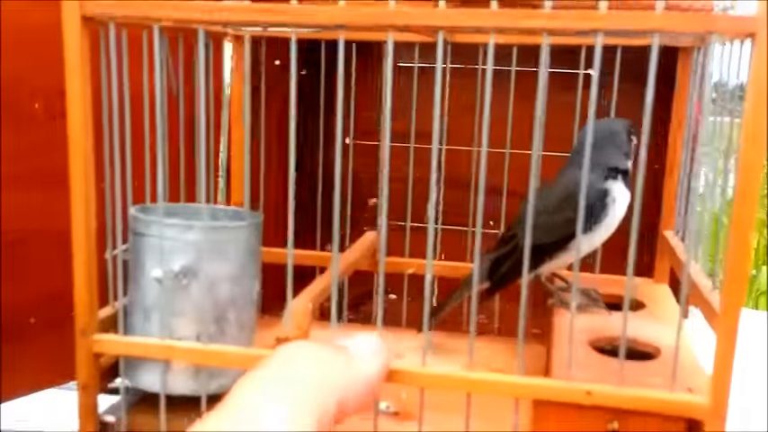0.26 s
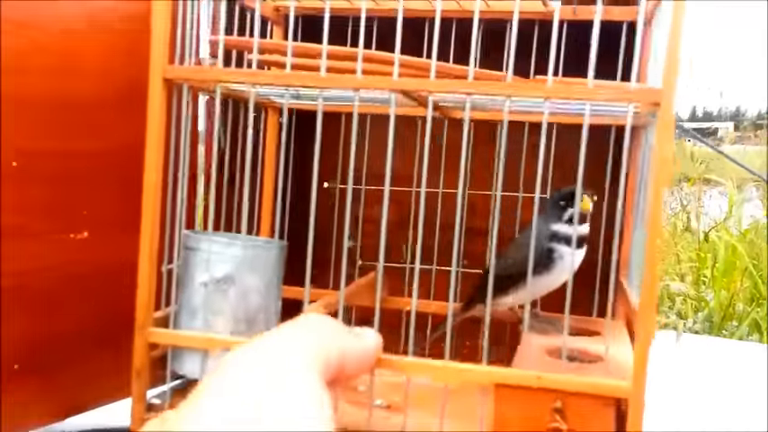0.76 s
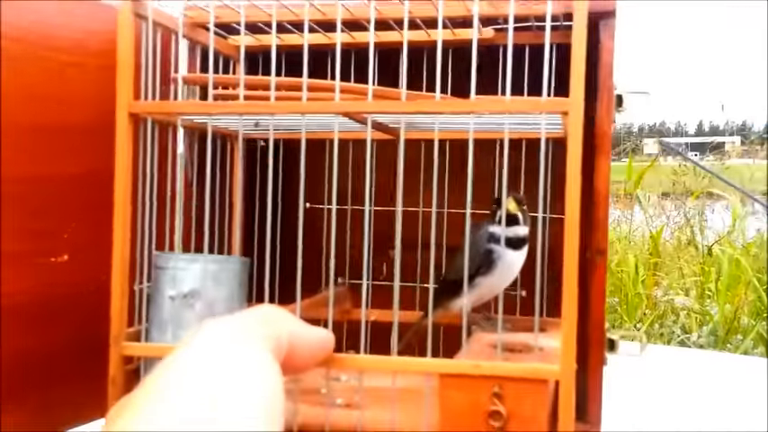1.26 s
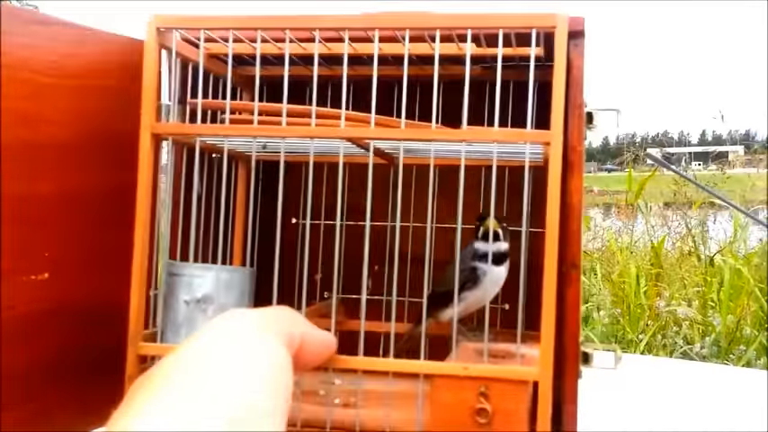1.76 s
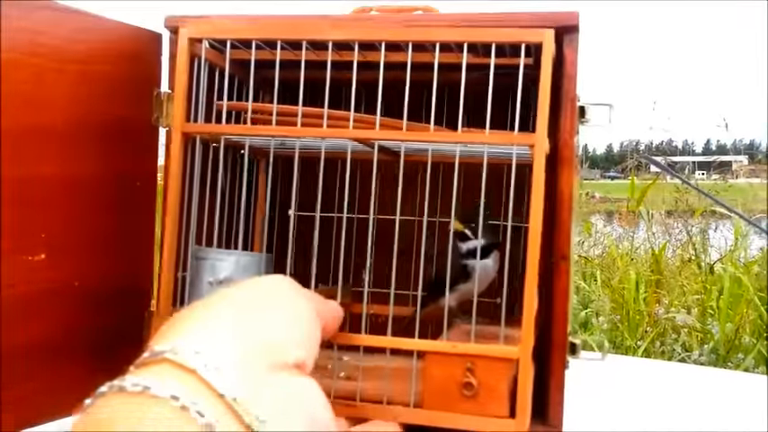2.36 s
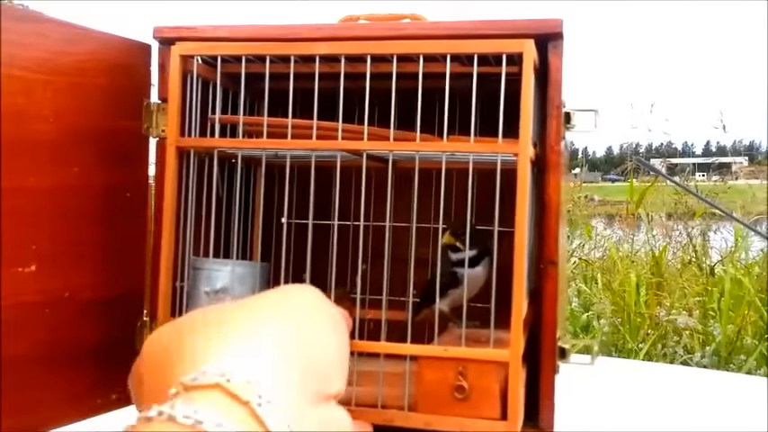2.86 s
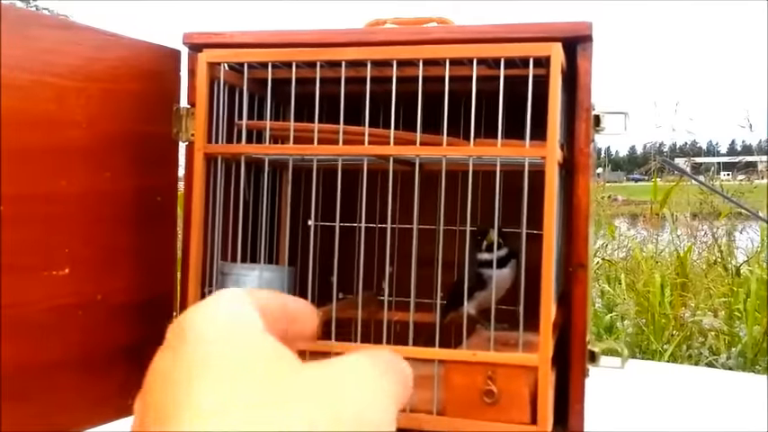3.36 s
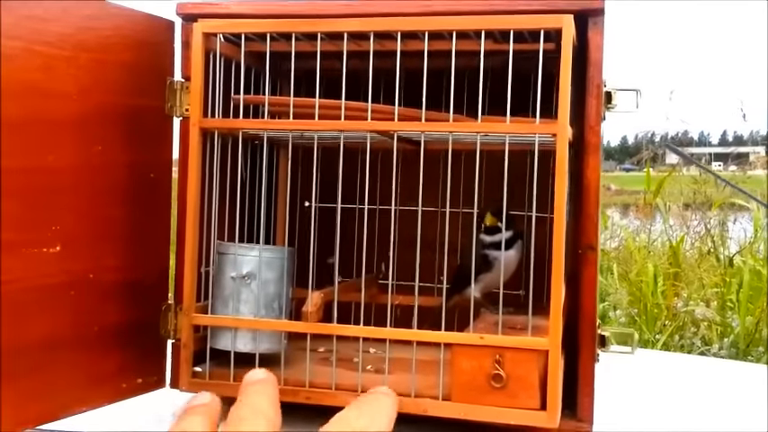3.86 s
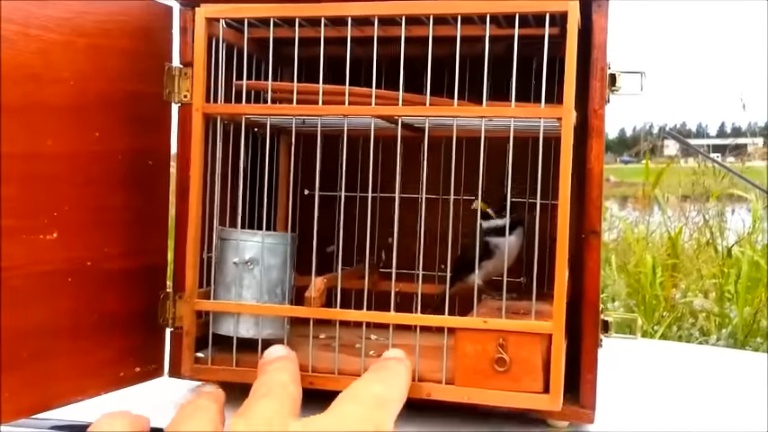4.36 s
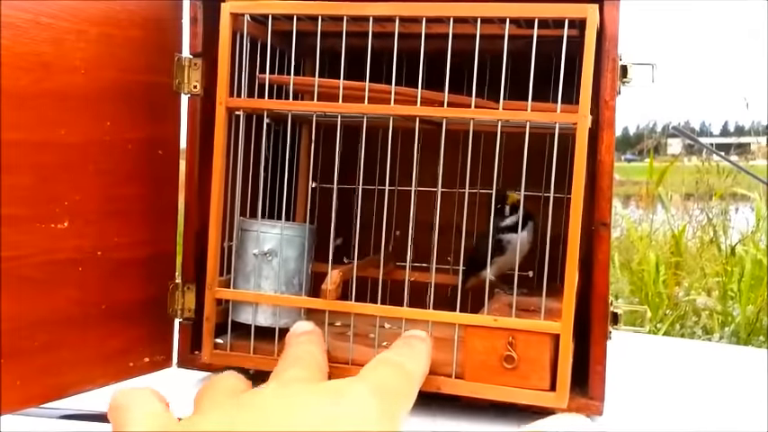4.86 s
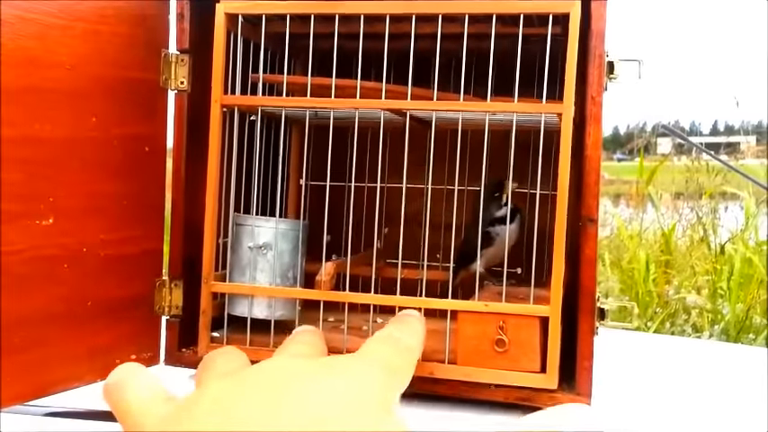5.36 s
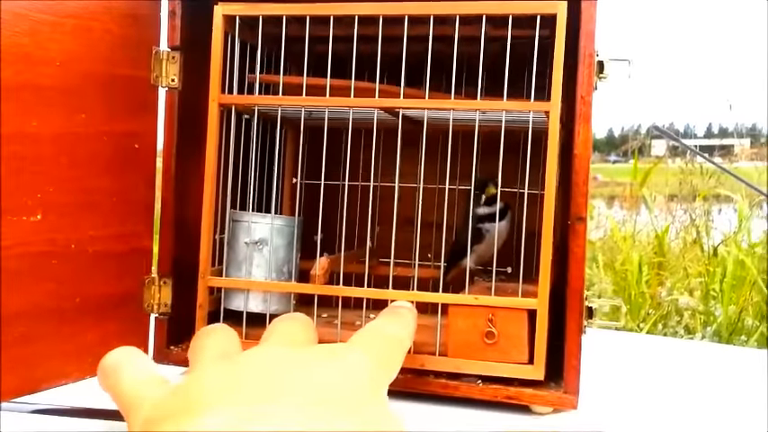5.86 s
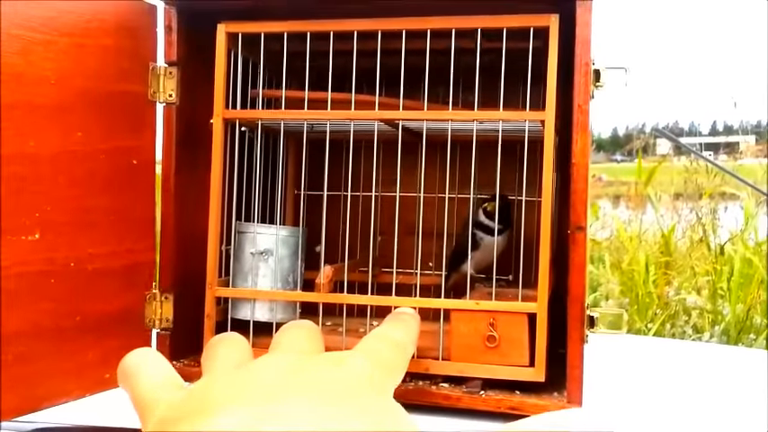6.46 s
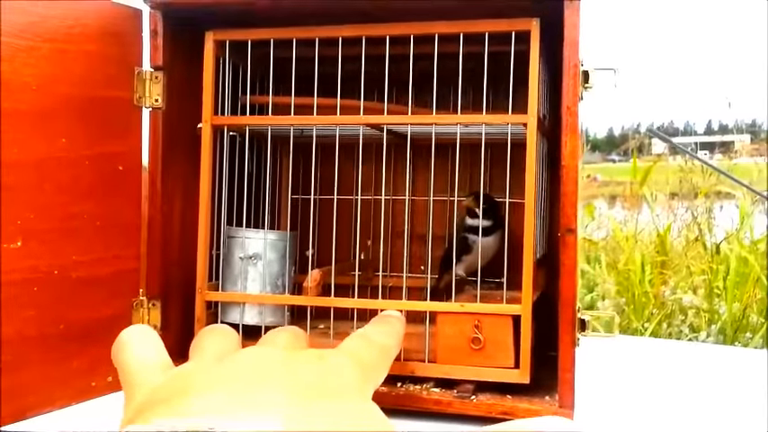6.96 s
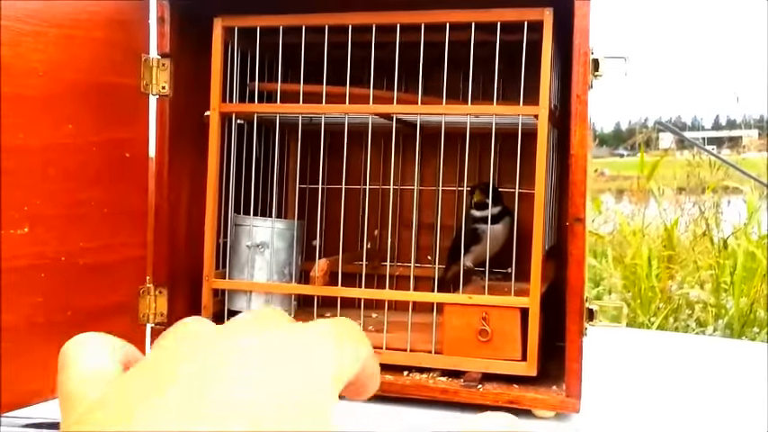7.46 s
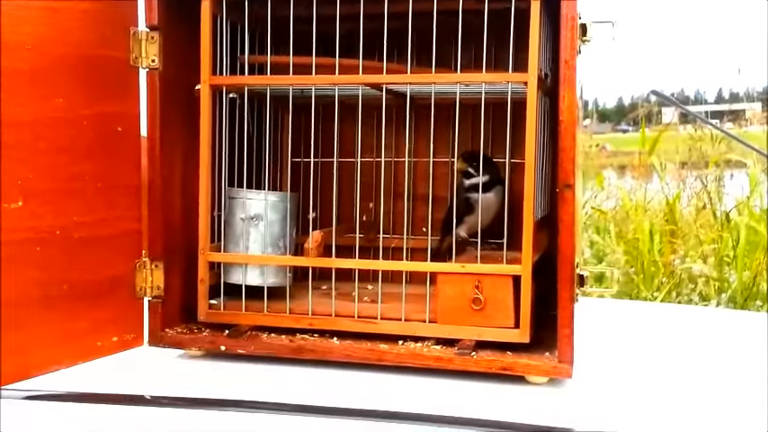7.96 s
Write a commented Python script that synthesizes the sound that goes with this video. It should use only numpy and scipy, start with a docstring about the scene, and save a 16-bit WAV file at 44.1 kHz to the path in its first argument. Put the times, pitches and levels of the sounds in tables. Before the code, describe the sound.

A handheld microphone close to a wooden bird cage outdoors picks up low handling rumble, continuous high crickets and thin far whistles. An early tick and sharp tap lead to about one second of bright, breathy, swooping finch song. A cluster of wooden knocks comes midway, then soft bumps, a feathery swish and rough doubled scolds to the end. The right side carries the scene, the left only hiss; noise suppression makes the background pump.

```python
"""Far traffic and air, handling rumble and crickets come first, soon joined by thin far bird whistles.
A beak ticks on a wire and fingers tap a wooden cage and the recorder; a small finch sings gliding notes
and later, after a soft rustle, scolds. Tones glide in pitch; noise is coloured; struck wood and wire ring.
Only the right input has a microphone; the left carries hiss alone.
A noise suppressor lowers both inputs whenever little stands out of the background."""
import sys
import numpy as np
from scipy import signal
from scipy.fft import rfft, irfft, next_fast_len
from scipy.io import wavfile
from scipy.ndimage import uniform_filter1d, minimum_filter1d, map_coordinates

SR = 44100
rng = np.random.default_rng(int(sys.argv[2]) if len(sys.argv) > 2 else 0)


def inscribe(sig):
    """Save sig as 16-bit PCM at rate SR to the path in sys.argv[1].

    A 1-D sig is mono; a 2-D sig holds one channel per row.
    Samples are clipped to [-1, 1] before scaling.
    """
    pcm = np.round(np.clip(np.atleast_2d(sig).T, -1, 1) * 32767)
    wavfile.write(sys.argv[1], SR, pcm.astype(np.int16))


def volts_from_db(level):
    """Convert decibel levels to linear amplitude ratios."""
    exponent = np.asarray(level, float) / 20
    return 10 ** exponent


N = 362502
T = np.arange(N) / SR  # seconds


def unit(x):
    """Scaled to rms 1."""
    return x / np.sqrt(np.mean(x ** 2))


def wobble(rate, size=N):
    """A smooth random curve through `rate` random points a second."""
    points = rng.standard_normal(int(size * rate / SR) + 4)
    return map_coordinates(points, [np.arange(size) * rate / SR])


def colour(spectrum, m):
    """Gains on an FFT grid, drawn through (Hz, dB) points; silent outside them."""
    hz, db = np.transpose(spectrum)
    grid_hz = np.fft.rfftfreq(m, 1 / SR)
    return volts_from_db(np.interp(np.log(grid_hz + 1), np.log(hz), db, left=-120, right=-120))


def shape(x, spectrum):
    """Filters a full-length sound by (Hz, dB) points."""
    m = next_fast_len(N)
    return irfft(rfft(x, m) * colour(spectrum, m), m)[:N]


def noise(spectrum):
    """Noise of rms 1 coloured by (Hz, dB) points."""
    return unit(shape(rng.standard_normal(next_fast_len(N)), spectrum))


def add(track, s, sound):
    """Mixes a sound into the track at s seconds."""
    part = track[round(s * SR):][:len(sound)]
    part += sound[:len(part)]


def whistle(hz, gain, tones, flutter_db, jitter_hz):
    """A gliding tone with harmonics; level and pitch flutter fast."""
    moving_hz = hz + jitter_hz * wobble(490, size=len(hz))
    phase = 2 * np.pi * np.cumsum(moving_hz) / SR + 2 * np.pi * rng.random()
    stack = sum(volts_from_db(db) * np.sin((k + 1) * phase) for k, db in enumerate(tones))
    return stack * gain * volts_from_db(flutter_db * wobble(252, size=len(hz)))


def calls(rows, tones, flutter_db, jitter_hz, edge):
    """Short notes whose pitch bends through three points under a swell."""
    track = np.zeros(N)
    for s, length, hz0, hz1, hz2, db in rows:
        u = np.linspace(0, 1, round(length * SR))
        hz = hz0 * (1 - u) * (1 - 2 * u) + 4 * hz1 * u * (1 - u) + hz2 * u * (2 * u - 1)  # parabola
        swell = np.sin(np.pi * u) ** edge
        add(track, s, whistle(hz, volts_from_db(db) * swell, tones, flutter_db, jitter_hz))
    return track


def glides(rows, tones, settle, attack, release, flutter_db, jitter_hz):
    """Notes gliding early (settle > 0) or late (< 0); attack and release are shares of the note."""
    track = np.zeros(N)
    for s, length, start_hz, end_hz, db in rows:
        u = np.linspace(0, 1, round(length * SR))
        hz = start_hz + (end_hz - start_hz) * np.expm1(-settle * u) / np.expm1(-settle)
        swell = np.clip(np.minimum(u / attack, (1 - u) / release), 0, 1)
        add(track, s, whistle(hz, volts_from_db(db) * swell, tones, flutter_db, jitter_hz))
    return track


def bursts(rows, spectrum, edge):
    """Noise of one colour under short swells."""
    swells = np.zeros(N)
    for s, length, db in rows:
        u = np.clip((T - s) / length, 0, 1)
        swells += volts_from_db(db) * np.abs(np.sin(np.pi * u)) ** edge * (T < s + length)
    return noise(spectrum) * swells


def echoes(x, t60, delay):
    """A diffuse answer of energy 1 that dies by 60 dB in t60 seconds."""
    t = np.arange(SR // 4) / SR
    tail = rng.standard_normal(len(t)) * volts_from_db(-60 * t / t60)
    answer = np.pad(tail / np.linalg.norm(tail), (round(delay * SR), 0))
    return signal.fftconvolve(x, answer)[:N]


# The colour of far traffic and air. Each row: pitch in Hz, relative level in dB per Hz.
AIR_COLOUR = [(25, -22), (100, -7.5), (165, 0), (250, -14.5), (340, -12), (500, -19.5), (1000, -18.5),
              (2000, -23), (3000, -25), (4600, -20.5), (7000, -26.5), (10000, -28.5), (14700, -29.5)]


def field():
    """Far traffic and air: a nearly even coloured noise."""
    return volts_from_db(-56 + 0.48 * wobble(2.925)) * noise(AIR_COLOUR)


# How strongly hands rumble on the recorder, around which the lumps vary. Each row: time in seconds, level in dB.
HANDLING_LEVEL = [(0, -64.5), (2, -65), (4.6, -56.5), (5.6, -63.5), (7.1, -63.5), (8.22, -71.5)]


def handling():
    """Hands on the recorder: low noise whose level wanders in slow and quick lumps."""
    level_db = np.interp(T, *np.transpose(HANDLING_LEVEL)) + 3.9 * wobble(5.4) + 3.7 * wobble(25)
    return volts_from_db(level_db) * noise([(30, -19), (60, 4), (170, -1), (350, -11)])


# The colour of the empty input. Each row: pitch in Hz, relative level in dB per Hz.
HISS_COLOUR = [(20, -7), (60, -7), (250, -7), (500, -5), (5000, -6.5), (14700, -6.5)]


def hiss():
    """The empty left input: steady faint noise."""
    return volts_from_db(-70.0) * noise(HISS_COLOUR)


# The three nearer crickets. Each row: middle of the first chirp in seconds, chirps per second,
# chirp length in seconds, pitch in Hz at start, middle and end, basic level in dB.
CRICKET_SINGERS = [(.056, 10.292, .05, 5720, 5990, 5780, -45.5),
                   (.050, 10.08, 0.05, 5750, 5600, 5400, -50.5), (0.047, 7.2, .03, 5950, 6100, 6200, -57)]
# How the first cricket swells and fades. Each row: time in seconds, change of level in dB.
FIRST_CRICKET_SWELL = [(0, 2), (1, 5), (1.7, 2), (3.3, -4), (4, -1.5), (5.8, -1.5), (6.2, -1), (7.2, 0),
                       (8.22, 2.5)]
# The blur of far crickets. Each row: pitch in Hz, relative level in dB.
CHORUS_COLOUR = [(4300, -37), (4650, -17), (5100, -17), (5400, -2), (5700, -4.5), (6150, -7), (6300, -44)]


def crickets():
    """Three steady singers drift in and out of step, over a blur of far ones."""
    track = volts_from_db(-61 + 2.6 * wobble(20)) * noise(CHORUS_COLOUR)
    for k, (first, rate, length, *pitch, db) in enumerate(CRICKET_SINGERS):
        starts = np.arange(first - length / 2, N / SR, 1 / rate)
        if k == 0:
            swell = np.interp(starts, *np.transpose(FIRST_CRICKET_SWELL))
        else:
            swell = 2 * wobble(0.49)[(starts * SR).astype(int)]
        levels = db + swell + rng.normal(0, 1.5, len(starts))
        rows = [(s, length, *pitch, level) for s, level in zip(starts, levels)]
        track += calls(rows, [0], flutter_db=2.8, jitter_hz=42, edge=0.97)
    return track + volts_from_db(-8.5) * echoes(track, 0.24, 0.0049)


# A far bird's quickening series. Each row: start of the held tone in seconds, its level in dB.
TRILL_NOTES = [(.09, -56), (.245, -52.5), (.395, -53.5), (.532, -52), (0.656, -55), (.77, -55),
               (.875, -51.5), (.98, -53.5), (1.097, -53.5), (1.2, -52), (1.905, -56), (1.985, -56),
               (2.06, -55.5), (2.205, -55), (2.287, -51.5), (2.375, -53), (2.445, -55), (2.51, -51.5)]


def trill():
    """Rows for up stroke, held tone and down stroke; the held tone shrinks through the series."""
    first_held_s, shrink_per_s = .043, 1.1
    stroke_s, stroke_db = .011, -0.5  # level relative to the held tone
    held_hz, low_hz, high_hz = 3120, 2850, 3600
    rows = []
    for s, db in TRILL_NOTES:
        held_s = first_held_s * np.exp(-shrink_per_s * s)
        rows += [(s - stroke_s - .3 * held_s, stroke_s, low_hz, high_hz, db + stroke_db),
                 (s, held_s, held_hz, held_hz, db),
                 (s + held_s, stroke_s, high_hz, low_hz, db + stroke_db)]
    return rows


# A far up-and-down call. Each row: start in seconds, level of the up half in dB.
SEESAW_CALLS = [(4.69, -65), (4.83, -59.5), (4.985, -57), (5.14, -57.5), (5.305, -57)]


def seesaw():
    """Rows for a rising half, then a louder falling half."""
    rows = []
    for s, db in SEESAW_CALLS:
        rows += [(s, .021, 6200, 7000, db), (s + .033, .022, 5300, 4500, db + 8)]
    return rows


# Other far whistles. Each row: start in seconds, length in seconds, start and end pitch in Hz, level in dB.
FAR_WHISTLES = [(.055, .035, 2900, 4500, -61.5), (.29, .08, 4750, 4330, -60),
                (.575, .215, 5800, 3330, -62.5), (1.11, .04, 4700, 4050, -57),
                (1.505, .055, 3714, 3705, -52.5), (3.55, 0.035, 3900, 4320, -58.5),
                (4.11, .04, 7290, 6940, -67), (4.68, 0.065, 4110, 4460, -55.5),
                (5.565, 0.047, 2750, 3100, -61), (5.72, 0.077, 3950, 2730, -65),
                (5.87, 0.048, 2700, 3080, -62.5), (6.02, .045, 2600, 2850, -64),
                (6.18, .055, 2700, 2980, -63), (6.36, 0.068, 2700, 2870, -66),
                (6.96, 0.072, 3970, 4000, -69), (7.12, .33, 3900, 4550, -64)]
# A low nasal call. Each row: start in seconds, length in seconds, start and end pitch in Hz, level in dB.
NASAL_CALL = [(5.135, .019, 885, 900, -54.5), (5.163, 0.043, 917, 945, -58.5)]


def far_birds():
    """Thin whistles and a low call with strong harmonics cross the field, with some echo."""
    birds = glides(FAR_WHISTLES + seesaw() + trill(), [0], settle=.7, attack=.3, release=0.32,
                   flutter_db=2.5, jitter_hz=25)
    birds += glides(NASAL_CALL, [3, -4, -14, -4.5], settle=1.5, attack=.2, release=.2,
                    flutter_db=0.0, jitter_hz=5)
    return birds + volts_from_db(-7.5) * echoes(birds, 0.19, 0.0088)


# The beak on a wire. Each row: time in seconds, level in dB.
BEAK_PECKS = [(.472, -54), (.477, -36.5)]
# How the wire rings. Each row: pitch in Hz, relative level in dB, time to die by 60 dB in seconds.
WIRE_RINGS = [(5020, -5, 0.013), (7200, 0.5, .012), (11400, -6.5, 0.0094)]


def pecks():
    """Tiny bright ticks: the wire rings briefly, with no wood in the sound."""
    track, t = np.zeros(N), np.arange(SR // 30) / SR
    for s, db in BEAK_PECKS:
        ring = sum(volts_from_db(db + own_db - 60 * t / t60) * np.sin(2 * np.pi * hz * t)
                   for hz, own_db, t60 in WIRE_RINGS)
        add(track, s, ring)
    return track + volts_from_db(-11) * echoes(track, .05, .002)


# Finger taps, except the row at 4.031 seconds: a short bright tick as the suppressor opens,
# probably on a cricket chirp.
# Each row: time in seconds, then the strength of wood, tick and thump in dB.
TAPS_AND_BRIGHT_TICK = [(.789, -36.5, -29.5, -60), (1.389, -52.5, -72, -77), (4.031, -66, -52, -66),
                        (4.348, -54.5, -47, -75.5), (4.541, -52.5, -72, -38.5), (4.56, -39.5, -61, -43),
                        (4.612, -32.5, -42, -61), (4.618, -40, -40, -61), (4.632, -44.5, -43, -51),
                        (4.844, -70, -45, -73), (5.505, -60, -60, -62), (5.796, -58, -50, -62),
                        (6.985, -68, -76, -36), (6.999, -62.5, -76, -31.5), (7.675, -72, -70, -41)]
# How the cage wood rings. Each row: pitch in Hz, usual relative level in dB, time to die by 60 dB in seconds.
CAGE_RINGS = [(278.3, 2.5, 0.17), (602, 2, 0.057), (1030, -8.5, 0.043), (1545, 0, 0.036), (1900, -5, 0.027),
              (2400, -12, 0.0057)]


def taps_and_bright_tick():
    """Taps ring the cage's wood, crack and push the microphone; the bright tick is mostly the crack noise."""
    track, t = np.zeros(N), np.arange(SR // 6) / SR
    crack = noise([(300, -18), (1500, -8.5), (4000, 3.5), (7000, 1.5), (10000, -10.5), (14700, -19)])
    clatter = noise([(200, -4), (700, 2.5), (1600, -10.5), (3000, -13.5)])  # loose slats
    onset = 1 - np.exp(-t / 0.00086)
    thump = -np.sin(2 * np.pi * 120 * t) * (t / 0.0028) * np.exp(1 - t / 0.0032)
    for s, wood_db, tick_db, thump_db in TAPS_AND_BRIGHT_TICK:
        wood = sum(volts_from_db(db + rng.normal(0, 3.1) - 60 * t / t60) * np.sin(2 * np.pi * hz * t)
                   for hz, db, t60 in CAGE_RINGS)
        wood += volts_from_db(-1.0 - 60 * t / 0.052) * clatter[round(s * SR):][:len(t)]
        tick = crack[round(s * SR):][:len(t)] * (volts_from_db(-60 * t / 0.022) + volts_from_db(-18 - 60 * t / 0.054))
        sharp = (volts_from_db(wood_db) * wood + volts_from_db(tick_db) * tick) * onset
        add(track, s, sharp + volts_from_db(thump_db) * thump)
    return track


# The three note tables share columns, with levels before the throat filter.
# Long notes that fall and level out.
# Each row: start in seconds, length in seconds, start and end pitch in Hz, level in dB.
SONG_SLIDES = [(2.298, 0.1, 6210, 4100, -24.5), (2.54, 0.068, 6300, 4910, -21.5),
               (2.724, 0.11, 6470, 4540, -21.5), (3.019, .035, 5055, 4780, -25.5)]
# Notes that fall ever faster while swelling, same columns: seconds, seconds, Hz, Hz, dB.
SONG_DROPS = [(2.132, .064, 4850, 4106, -25), (2.24, 0.061, 6830, 6000, -41.5),
              (2.282, 0.025, 5100, 4800, -34.5), (2.62, 0.033, 3570, 3216, -25),
              (2.912, 0.015, 9750, 9100, -33), (2.957, .045, 4090, 3110, -24),
              (3.055, 0.024, 4950, 4460, -35.5), (3.074, 0.0277, 3650, 2955, -27)]
# Notes that rise and level out, same columns: seconds, seconds, Hz, Hz, dB.
SONG_FLICKS = [(1.792, 0.031, 2700, 3870, -42), (1.808, 0.047, 4230, 4900, -34),
               (2.092, 0.034, 4300, 4800, -43.5), (2.128, 0.021, 3340, 3600, -41.5),
               (2.604, 0.026, 3680, 4410, -30), (2.885, 0.035, 8850, 9760, -34),
               (2.922, 0.02, 4160, 5100, -32.5), (2.941, .013, 3970, 5220, -26),
               (3.008, 0.013, 4260, 5230, -31)]
# Strength of each harmonic of the song in dB, lowest first.
SONG_HARMONICS = [0, -28.5, -40]
# What throat and beak let through. Each row: pitch in Hz, gain in dB.
THROAT_AND_BEAK = [(2800, -9.5), (3500, -5), (4200, -6), (4850, 0), (5400, -16), (5900, -8.5), (6800, -6),
                   (7800, -19), (9500, -13.5), (12500, -1), (14700, -4)]


def finch_song():
    """Breathy gliding whistles pass through throat and beak; the wooden box rings behind them."""
    song = glides(SONG_SLIDES, SONG_HARMONICS, settle=2.3, attack=.18, release=0.11,
                  flutter_db=1.2, jitter_hz=35)
    song += glides(SONG_DROPS, SONG_HARMONICS, settle=-0.33, attack=0.56, release=0.097,
                   flutter_db=1.6, jitter_hz=29.8)
    song += glides(SONG_FLICKS, SONG_HARMONICS, settle=3.0, attack=0.44, release=.15,
                   flutter_db=2.5, jitter_hz=29.8)
    # turbulent air smears each line; the open beak favours the top
    breath = song * noise([(20, 4.0), (1200, 2.5), (2600, -21), (9000, -26)])
    open_beak = signal.butter(4, 5800, "high", fs=SR, output="sos")
    song += volts_from_db(-9.5) * signal.sosfilt(open_beak, breath)
    song = shape(song, THROAT_AND_BEAK)
    return song + volts_from_db(-11) * echoes(song, .16, 0.0024)


# Feathers or seed husks. Each row: start in seconds, length in seconds, level in dB.
RUSTLE_SWISHES = [(7.06, 0.16, -61.5), (7.29, 0.081, -58.5)]


def rustle():
    """Two soft high swishes of noise."""
    return bursts(RUSTLE_SWISHES, [(6000, -13), (6600, 5), (7800, 3), (8600, -21)], edge=0.95)


# Harsh calls. Each row: start in seconds, length in seconds, start and end pitch in Hz, level in dB.
SCOLD_CALLS = [(7.573, .026, 1993, 2420, -42), (7.619, .016, 2140, 2400, -40),
               (7.645, 0.016, 2085, 1880, -38), (7.724, 0.032, 1887, 2490, -40),
               (7.776, 0.017, 1992, 2336, -37), (7.875, .03, 1970, 2495, -37.5),
               (7.922, .021, 1954, 2246, -35), (8.024, 0.032, 1865, 2450, -37),
               (8.074, 0.021, 1975, 2250, -35), (8.184, .034, 2067, 2253, -34)]
# Strength of each harmonic of the calls in dB, lowest first.
SCOLD_HARMONICS = [-11, 2, -10, -22.5, -27, -34]


def finch_scold():
    """Rough calls break upward and close in a hoarse rasp; the wooden box rings behind them."""
    breaks, rasps = [], []
    for s, length, _, end_hz, db in SCOLD_CALLS:
        close_s = s + length - .004  # just before the call ends
        breaks.append((close_s, .013, end_hz, end_hz * 1.35, db - 5))
        rasps.append((close_s, .026, db - 5.5))
    scold = glides(SCOLD_CALLS + breaks, SCOLD_HARMONICS, settle=-.3, attack=0.21, release=0.26,
                   flutter_db=2.5, jitter_hz=49.6)
    throat = [(1700, -24), (2200, -19), (3800, 0.5), (5200, -2), (7000, -15), (10000, -23.5), (14000, -29)]
    scold += volts_from_db(2.8 * wobble(300)) * bursts(rasps, throat, edge=0.43)
    return scold + volts_from_db(-8) * echoes(scold, 0.22, .003)


def scene():
    """Everything reaches the right input; the left holds its own hiss."""
    right = field() + handling() + crickets() + far_birds() + pecks() + taps_and_bright_tick()
    right += finch_song() + rustle() + finch_scold()
    return np.array([hiss(), right])


def suppressor(x, slope, depth_db, whiten, hold, release):
    """Gain follows how far the sound stands over its own background; hold and release in seconds."""
    hz, t, z = signal.stft(x, SR, nperseg=1024, noverlap=896)
    power = uniform_filter1d(np.abs(z) ** 2, size=16, axis=0)[(hz > 250) & (hz < 14800)]
    background = np.percentile(uniform_filter1d(power, size=30, axis=1), 20, axis=1)[:, None]
    weight = background ** -whiten  # quiet bands count for more
    over_db = 10 * np.log10(np.sum(power * weight, axis=0) / np.sum(background * weight))
    cut_db = np.clip(depth_db - slope * over_db, 0, depth_db)
    span = round(hold * SR)
    held = minimum_filter1d(np.interp(T, t, cut_db), span, origin=(span - 1) // 2)
    lag = np.exp(-1 / (release * SR))
    closing = signal.lfilter([1 - lag], [1, -lag], held - depth_db) + depth_db
    cut = np.minimum(held, closing)  # opens fast, closes slowly
    return volts_from_db(-uniform_filter1d(cut, 400))


def roll_off(x):
    """The treble ends steeply here."""
    return signal.sosfilt(signal.butter(12, 15770, fs=SR, output="sos"), x)


# Resting level of the inputs. Each row: one input's constant offset (full scale is 1), left then right.
RESTING_LEVEL = [
    [-.0003],
    [-.0004],
]


def record(dry):
    """The right input sets one suppressor gain, which acts on both inputs and their resting levels."""
    gain = suppressor(dry[1], slope=1.236, depth_db=14.5, whiten=0.6, hold=0.0081, release=0.017)
    mix = (dry + RESTING_LEVEL) * gain
    return roll_off(mix)


dry = scene()
out = record(dry)
inscribe(out)
```